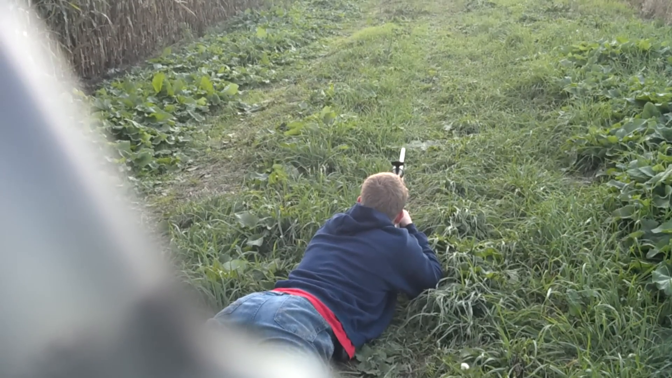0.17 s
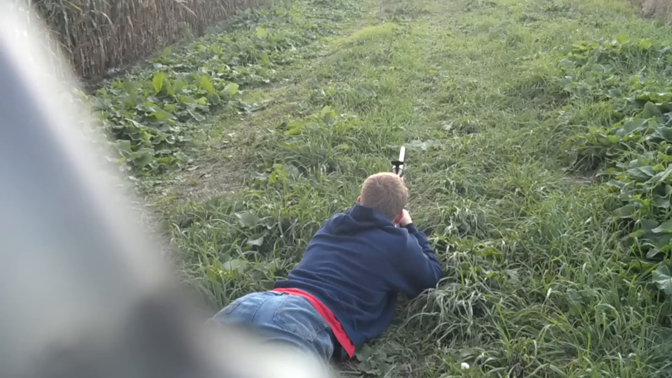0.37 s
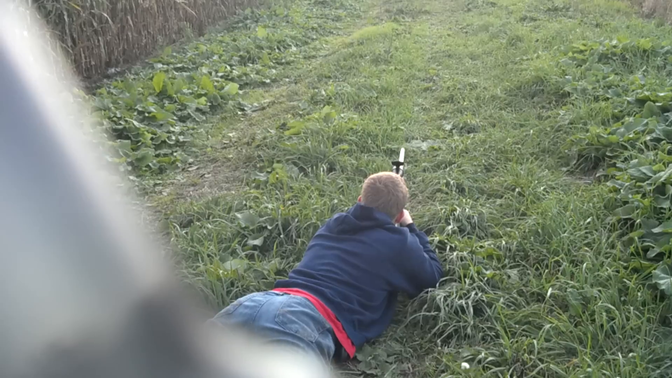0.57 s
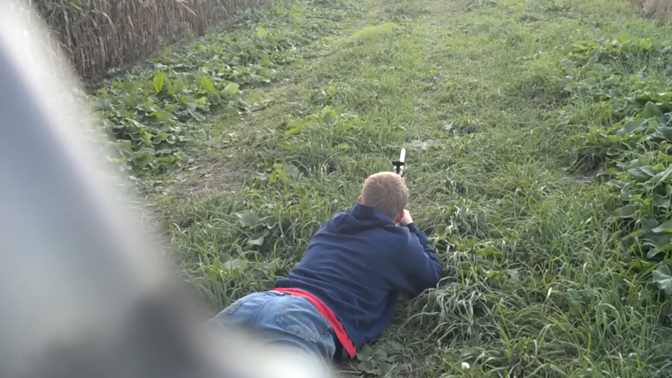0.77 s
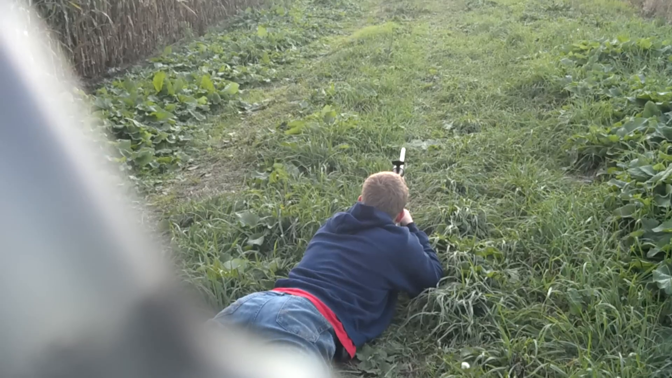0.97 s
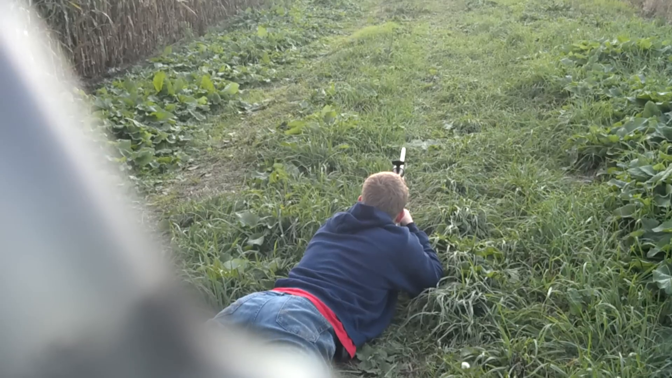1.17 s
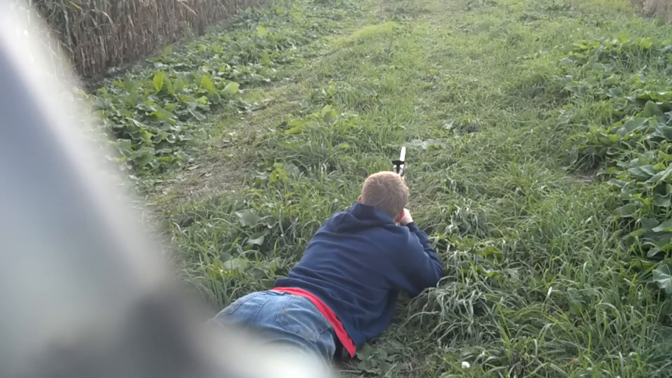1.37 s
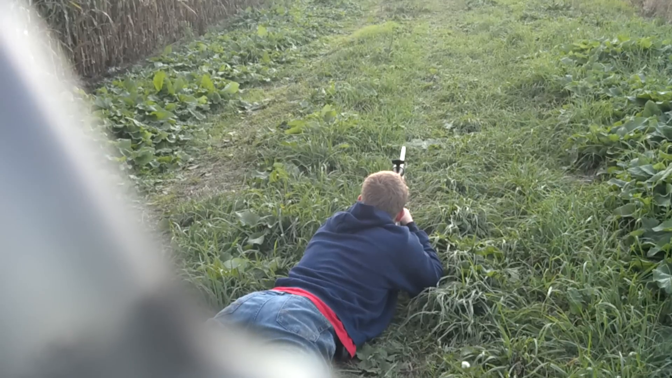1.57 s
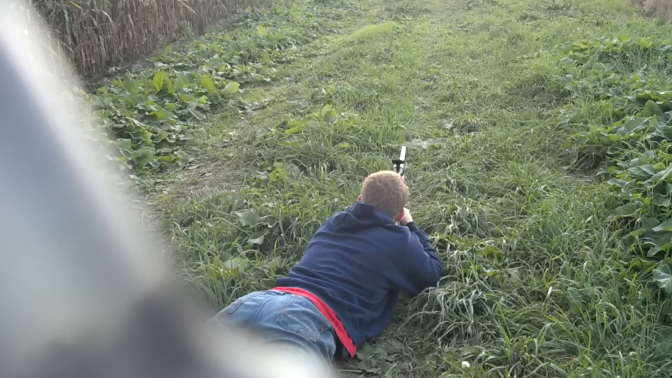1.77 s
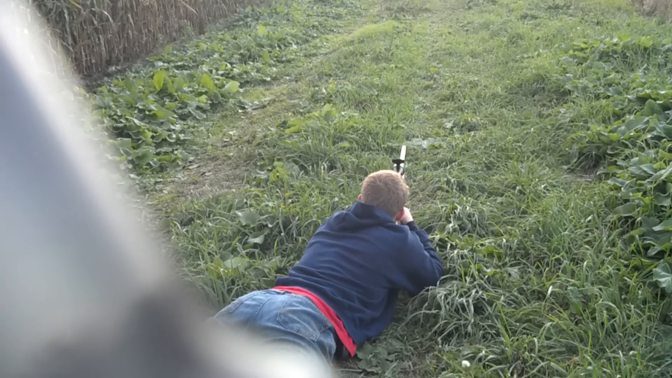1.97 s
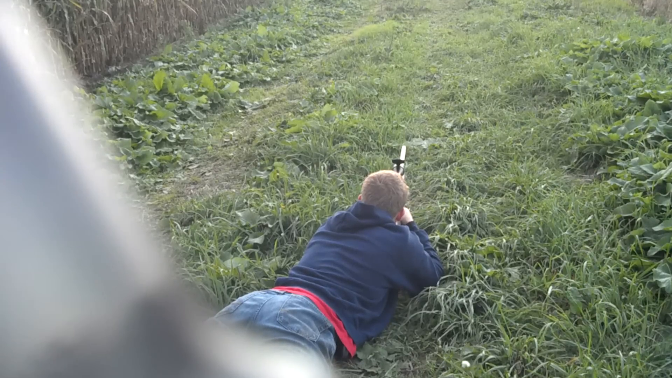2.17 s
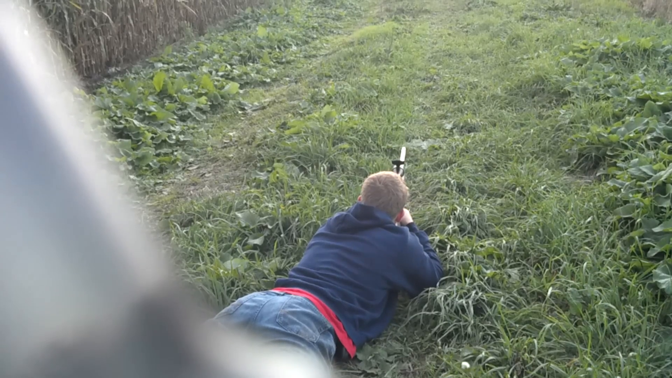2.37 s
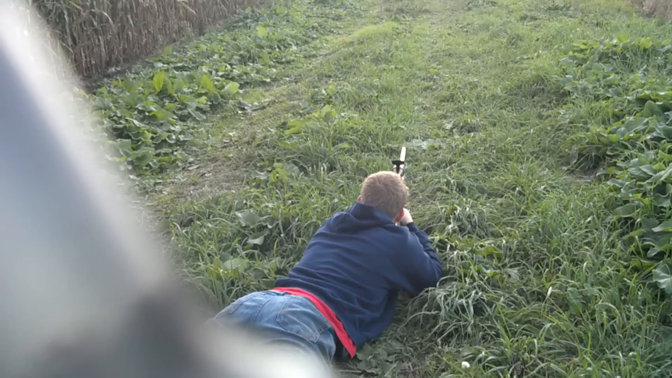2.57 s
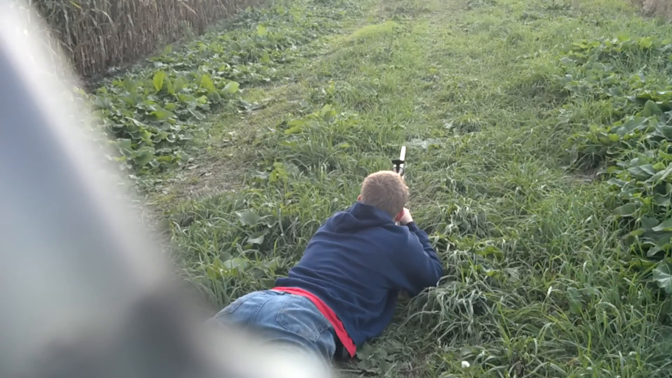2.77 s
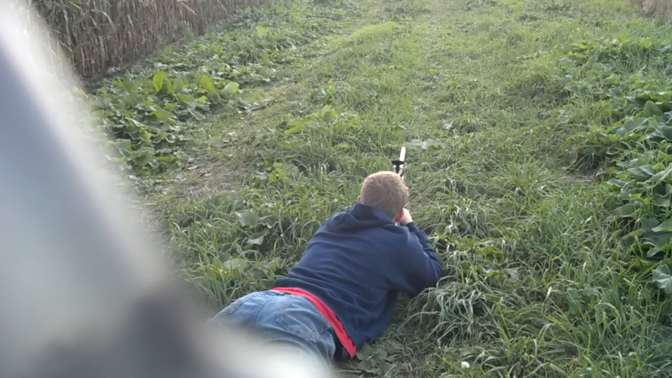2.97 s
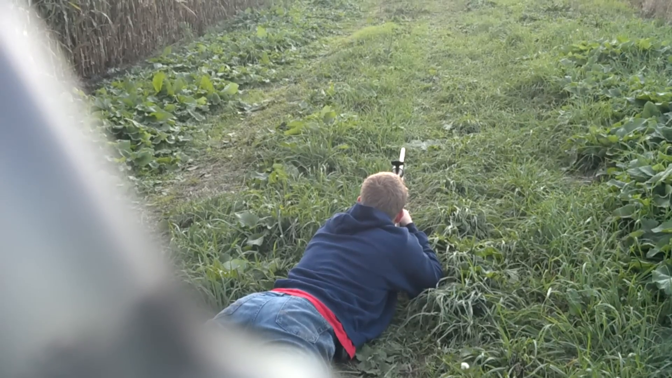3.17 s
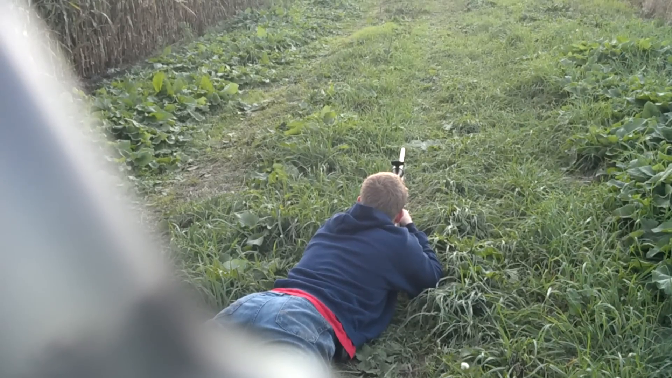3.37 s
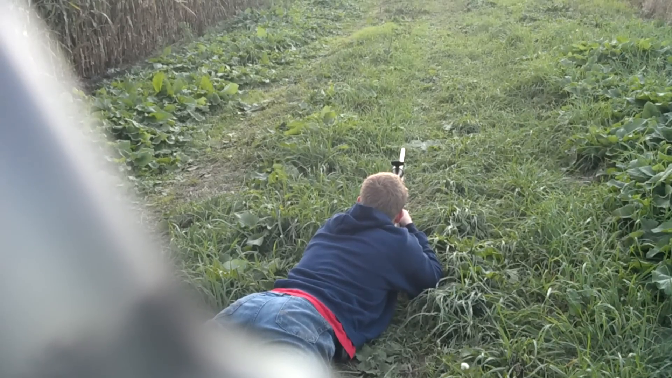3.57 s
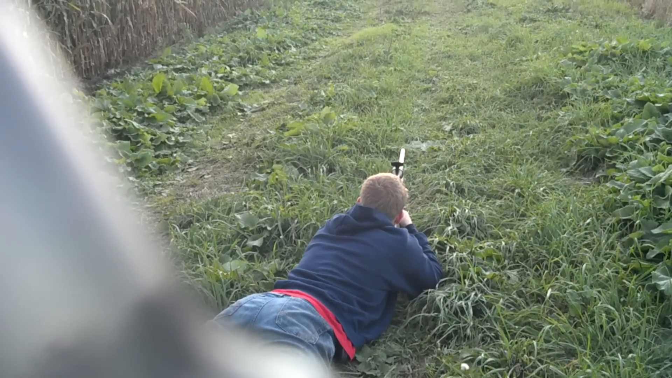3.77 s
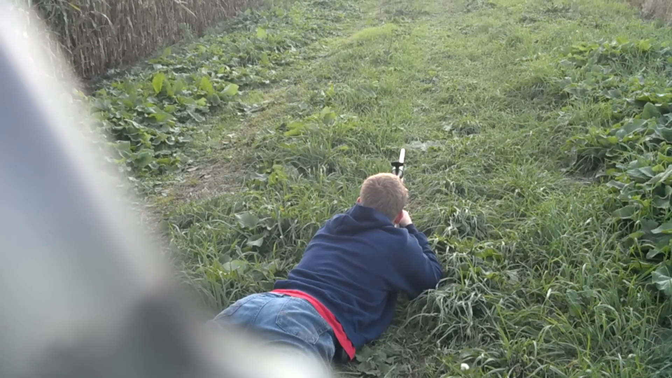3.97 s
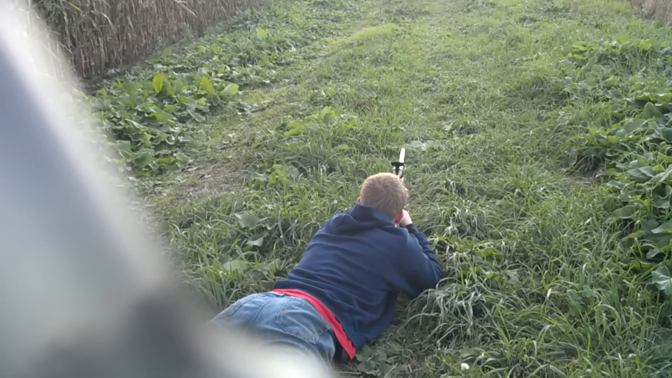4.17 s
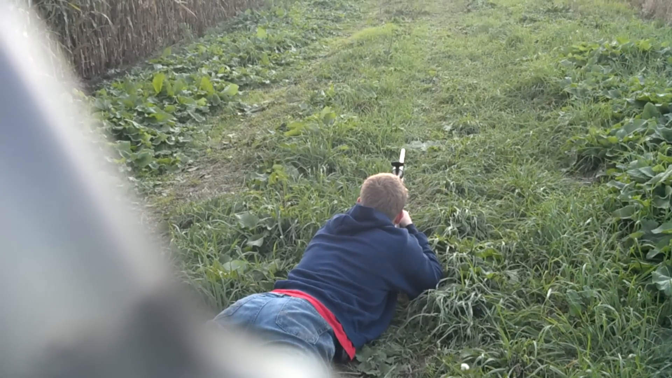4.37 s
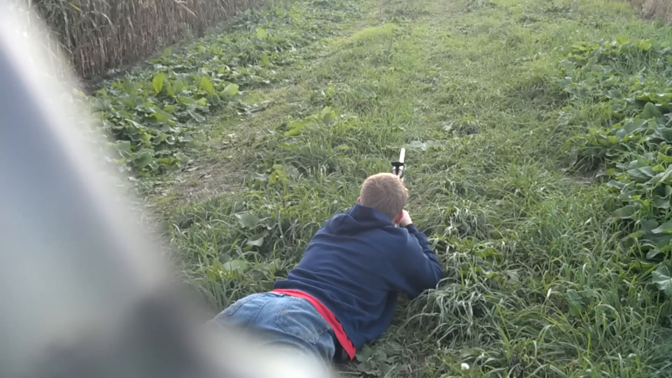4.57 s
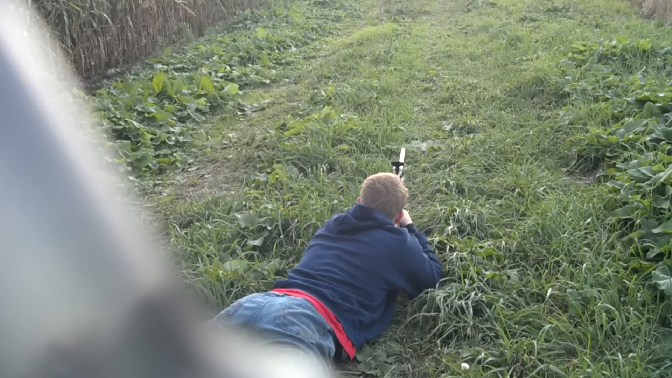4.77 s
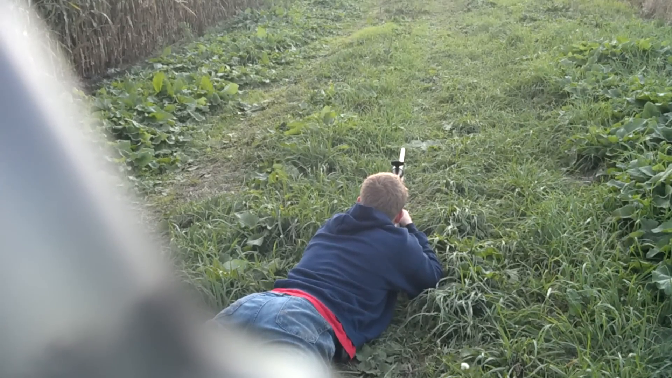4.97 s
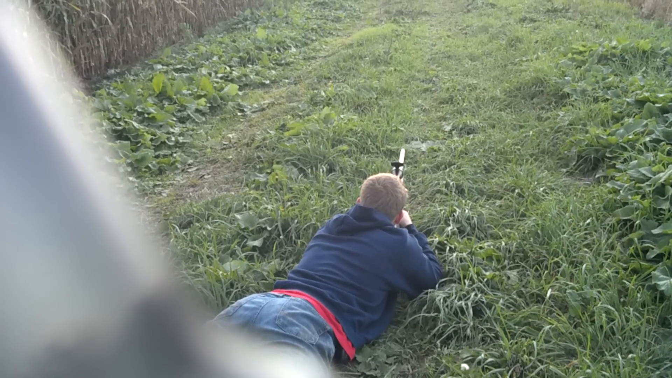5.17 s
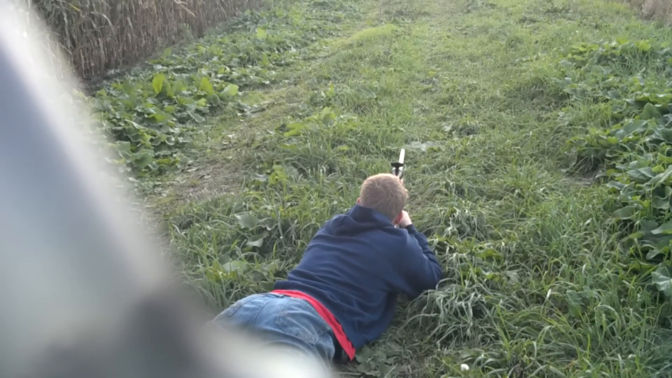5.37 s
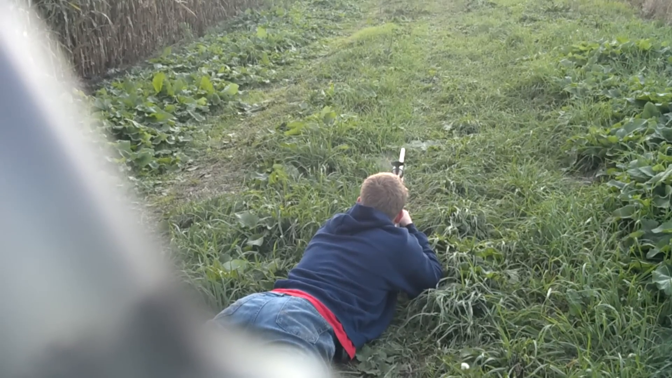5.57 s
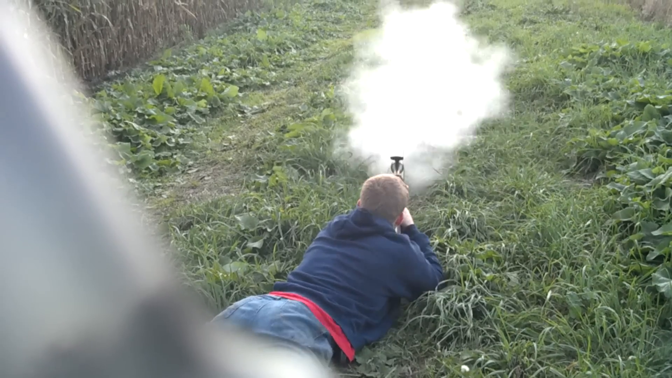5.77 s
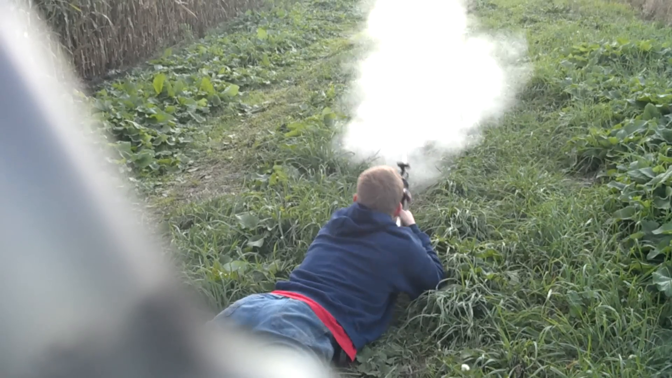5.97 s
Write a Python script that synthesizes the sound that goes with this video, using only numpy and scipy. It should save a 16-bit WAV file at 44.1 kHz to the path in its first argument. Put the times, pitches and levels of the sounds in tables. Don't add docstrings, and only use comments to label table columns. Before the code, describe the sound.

Faint crickets, hiss and distant traffic hum with small handling ticks, then a sharp cap snap and a black-powder rifle blast rolling outward, cut short.

```python
import sys
import numpy as np
from scipy import signal
from scipy.fft import rfft, irfft
from scipy.io import wavfile
from scipy.ndimage import uniform_filter1d, map_coordinates

SR = 44100
rng = np.random.default_rng(int(sys.argv[2]) if len(sys.argv) > 2 else 0)


def natural_amplitude(level_db):
    exponent = np.asarray(level_db, float) / 20
    return 10 ** exponent


def output_pcm(signal):
    pcm = np.clip(np.atleast_2d(signal).T, -1, 1) * 32767
    wavfile.write(sys.argv[1], SR, np.round(pcm).astype(np.int16))


N = 264688
t = np.arange(N) / SR
CAP_S, CHARGE_S = 5.5678, 5.6765
LATE_SAMPLES = 16

# (loudest at [s], half length [s], engine hum [dB], lift of the road rumble [dB])
VEHICLES = [
    (0.0, 0.06, -68, 1),
    (0.834, 0.52, -70.5, 3),
    (2.68, 0.2, -86.5, 2.5),
    (3.277, 0.31, -72, 1),
    (4.856, 0.47, -73.5, 3),
]


def rms_one(x):
    return x / np.sqrt(np.mean(x ** 2) + 1e-20)


def at_hz(points, hz, axis=1):
    points = np.array(points)
    return np.interp(np.log(hz), np.log(points[:, 0]), points[:, axis])


def drift(rate):
    knots = rng.standard_normal(1600)
    return map_coordinates(knots, [t * rate + 2], order=3)


def coloured(points, size=N):
    hz = np.maximum(np.fft.rfftfreq(size, 1 / SR), 10)
    low_cut = hz ** 2 / (hz ** 2 + points[0][0] ** 2 / 2)
    spectrum = rfft(rng.standard_normal(size)) * natural_amplitude(at_hz(points, hz)) * low_cut
    return rms_one(irfft(spectrum, size))


def butter(x, order, hz, kind):
    return signal.sosfilt(signal.butter(order, hz, kind, fs=SR, output="sos"), x)


def resonate(x, hz, width_hz):
    r = np.exp(-np.pi * width_hz / SR)
    zeros = np.array([1, 0, -1]) * (1 - r * r) / 2
    return signal.lfilter(zeros, [1, -2 * r * np.cos(2 * np.pi * hz / SR), r * r], x)


def resonate_twice(x, hz, width_hz):
    return resonate(resonate(x, hz, width_hz), hz, width_hz)


def ring(clicks, hz, t60):
    r, w = natural_amplitude(-60 / (t60 * SR)), 2 * np.pi * hz / SR
    return signal.lfilter([0, np.sin(w)], [1, -2 * r * np.cos(w), r * r], clicks + 1e-18)


def shot():
    # (frequency [Hz], level [dB], t60 [s])
    lock_modes = [(2050, -9, 0.018), (3010, -19, 0.039), (6690, -8, 0.007)]
    # (frequency [Hz], density [dB per Hz], t60 [s])
    cap_scatter = [(80, 0, 0.11), (312, 9.5, 0.15), (710, -7, 0.22), (2070, 3, 0.18), (4950, -10, 0.25),
                   (8600, -17.5, 0.3), (14400, -26, 0.13)]
    # (frequency [Hz], density [dB per Hz], t60 [s])
    near_rows = [(80, 9.5, 0.056), (214, 7, 0.29), (685, -12, 0.4), (2450, -5.5, 0.81), (3700, -8, 0.36),
                 (8170, -17, 0.45), (14600, -29.5, 0.27)]
    # (frequency [Hz], density [dB per Hz], t60 [s])
    far_field = [(100, -0.5, 1.7), (493, -9, 1.34), (1200, -3, 1.34), (2300, -1.5, 1.7), (3630, -5.5, 1.7),
                 (7650, -11, 0.98), (13100, -35.5, 1.2)]
    blow = 1.0 * (np.arange(N) == round(CAP_S * SR))
    lock = sum(natural_amplitude(db) * ring(blow, hz, t60) for hz, db, t60 in lock_modes)
    spatter = scatter(cap_scatter, CAP_S, -6.5, rise_ms=0.071, hold_ms=1.2)
    spatter *= natural_amplitude(-np.maximum(t - CAP_S, 0) * 2600)
    cap = butter(spatter, 2, 800, "high")
    cap += scatter(cap_scatter, CAP_S, -32.5, rise_ms=0.71, hold_ms=2.2)
    near = scatter(near_rows, CHARGE_S, -11.5, rise_ms=2.2, hold_ms=23.0)
    far = scatter(far_field, CHARGE_S, -22.5, rise_ms=97, hold_ms=23.0)
    far = butter(far, 4, 120, "high")
    return pulses() + lock + cap + near + far


def pulses():
    # (time [s], peak [dB], sign [+-1], squeeze [ms], low swing [dB])
    cap_pulses = [
        (5.56748, 22.5, -1, .23, -40),
        (5.56832, 9, -1, .12, -5),
        (5.56872, 3, 1, .2, -40),
        (5.5698, -3, 1, .15, -40),
    ]
    # (time [s], peak [dB], sign [+-1], squeeze [ms], low swing [dB])
    charge_pulses = [
        (5.6778, -9, 1, .6, -30),
        (5.6808, 2, 1, 1.1, -16),
        (5.6840, -2, -1, .5, -22),
        (5.6972, -4, 1, 1.2, -10),
    ]
    out = np.zeros(N)
    for s, db, sign, ms, swing_db in cap_pulses + charge_pulses:
        since_ms = np.maximum(t - s, 0) * 1000
        wave = (1 - since_ms / ms) * np.exp(-since_ms / ms) * (1 - np.exp(-since_ms / .04))
        swing = np.sin(2 * np.pi * .13 * since_ms ** .93) * np.exp(-since_ms / 3.6)
        out += sign * (natural_amplitude(db) * wave + natural_amplitude(swing_db) * swing)
    return out


def scatter(points, start_s, level_db, rise_ms, hold_ms):
    first = int(5.5 * SR)
    since = np.maximum(t[first:] - start_s, 0)
    dying = np.maximum(since - hold_ms / 1000, 0)
    noise = coloured(points, size=N - first)
    edges = 40 * 2 ** np.arange(0, 9.1, .5)
    out = np.zeros(N)
    for k, (low, high) in enumerate(zip(edges, edges[1:])):
        band = (-1) ** k * butter(noise, 2, [low, high], "band")
        t60 = at_hz(points, np.sqrt(low * high), axis=2)
        out[first:] += band * natural_amplitude(-60 * dying / t60)
    out[first:] *= (1 - np.exp(-since * 1000 / rise_ms)) ** 2
    return out * natural_amplitude(level_db) * natural_amplitude(1.2 * drift(150))


def rustle():
    # (frequency [Hz], density [dB per Hz])
    cloth = [(300, 15), (1000, 0.5), (2500, 4.5), (5500, -1.5), (9500, -6), (15200, -20), (15500, -60)]
    start_s, attack_s, hold_s, release_s = 0.0, 0.047, 0.208, 0.012
    since = t - start_s
    fade = np.exp(-np.maximum(since - attack_s - hold_s, 0) * 3 / release_s)
    stroke = np.clip(since / attack_s, 0, 1) * fade
    arch_db = -2 * np.minimum(2 * (since - attack_s) / hold_s - 1, 1) ** 2
    return coloured(cloth) * stroke * natural_amplitude(-59.5 + arch_db + 2.5 + 1.6 * drift(199.0))


def ticks():
    # (time [s], bright part [dB], dull part [dB], length [ms])
    touches = [(0.1718, -47, -49, 6.7), (0.2039, -45.5, -65, 3.4), (0.2844, -58, -67, 2.9),
               (1.3004, -74, -53.5, 5.1), (2.116, -54.5, -60.5, 6.4), (2.1274, -62, -74, 3.1),
               (2.335, -57, -52, 5.3), (2.342, -48, -53.5, 3.5), (2.4444, -70, -64, 2.5),
               (2.5372, -56, -63.5, 4.6), (3.2694, -63, -66.5, 4), (3.678, -57, -59, 3.6),
               (4.049, -71, -60.5, 3.8), (4.3315, -52, -56.5, 8.1), (4.378, -44.5, -63, 8)]
    # (frequency [Hz], width [Hz], level [dB])
    case_modes = [(3000, 2900, -5.5), (4700, 910, -9), (7460, 1200, -5), (10800, 3000, -27),
                  (13500, 3200, -27)]
    # (time [s], level [dB])
    knocks = [
        (0.2844, -65),
        (1.3004, -45),
        (2.4444, -61.5),
        (2.5374, -65),
        (4.3784, -53.5),
    ]
    bright, dull, hollow = np.zeros((3, N))
    u = np.arange(1500) / SR
    for s, db, dull_db, ms in touches:
        i = round(s * SR)
        rate = 3200 / ms
        burst = rng.standard_normal(1500) * u * rate * np.exp(-u * rate)
        bright[i:i + 1500] += natural_amplitude(db + 14) * burst
        dull[i:i + 1500] += natural_amplitude(dull_db + 21.5) * resonate_twice(burst, 1290, 1760)
    for s, db in knocks:
        hollow[round(s * SR)] += natural_amplitude(db)
    shell = sum(natural_amplitude(db) * resonate(bright + 1e-18, hz, width) for hz, width, db in case_modes)
    ping, ping_hz, ping_t60 = natural_amplitude(-44) * (np.arange(N) == round(3.677 * SR)), 4630, 0.03
    shell = shell + ring(ping, ping_hz, ping_t60) - ring(ping, ping_hz, ping_t60 / 4)
    knock = ring(hollow, 748, 0.14) - ring(hollow, 748, 0.028) + natural_amplitude(3.5) * ring(hollow, 520, 0.022)
    return shell + dull + knock


def trills():
    # (carrier [Hz], pulse rate [per s], level [dB], share of the rate lost when tiring [0-1])
    singers = [(4800, 43.3, -67, .19), (4450, 52, -77, 0), (4250, 43.6, -72.5, 0), (4050, 44.5, -68, 0),
               (3700, 44, -72.5, 0)]
    tires_s, tiring_s = 3.3, 0.72
    out = np.zeros(N)
    for hz, per_s, level_db, tiring in singers:
        per_s = per_s * (1 - tiring * np.clip((t - tires_s) / tiring_s, 0, 1))
        stroke = np.cumsum(per_s * (1 + .008 * drift(1.2))) / SR % 1
        pitch = hz * (1 + .008 * drift(3) - .26 * (stroke - .25))
        tone = np.sin(2 * np.pi * np.cumsum(pitch) / SR)
        pulse = np.sin(np.pi * np.minimum(stroke / .42, 1)) ** 2
        out += tone * pulse * natural_amplitude(level_db + 1.6 * drift(5))
    return out


def crickets():
    # (carrier [Hz], width [Hz], pulse rate [per s], depth [0-1], level [dB])
    choirs = [(3750, 480, 39, 0.14, -73), (4106, 490, 45, 0.6, -72.5), (4424, 610, 90, 0.7, -78)]
    out = np.zeros(N)
    for hz, width_hz, per_s, depth, level_db in choirs:
        carrier = rms_one(resonate_twice(rng.standard_normal(N), hz, width_hz))
        wing = np.cos(2 * np.pi * np.cumsum(per_s * (1 + 0.0414 * drift(1.9))) / SR)
        out += carrier * (1 + np.clip(depth, 0, 1) * wing) * natural_amplitude(level_db + 1.3 * drift(2.47))
    return out


def drone():
    hum = rms_one(resonate_twice(rng.standard_normal(N), 290, 60))
    rest_db = -81
    return hum * natural_amplitude(5) * (natural_amplitude(rest_db) + natural_amplitude(np.array(VEHICLES)[:, 2]) @ swells())


def air():
    # (frequency [Hz], density [dB per Hz])
    air_spectrum = [(60, -15), (130, 4.5), (300, -12.5), (500, -12.5), (1300, -24), (7000, -29),
                    (15200, -35.5), (15500, -80)]
    noise = coloured(air_spectrum)
    low = butter(noise, 2, 380, "low")
    swell_db = -1.5 + np.array(VEHICLES)[:, 3] @ swells()
    return natural_amplitude(-61.5) * (noise - low + low * natural_amplitude(swell_db + 2.2 * drift(5.2)))


def swells():
    return np.array([np.exp(-((t - s) / half_s) ** 4) for s, half_s, _, _ in VEHICLES])


def scene():
    ducked = natural_amplitude(-6 * (t > CAP_S))
    field = air() + drone() + crickets() + trills()
    mono = field * ducked + rustle() + ticks() + shot()
    return np.array([mono, mono])


def sum_difference(left, right):
    # (frequency [Hz], share lost [0-1])
    pruned = [(300, 0.16), (1500, 0), (4000, 0.04), (7000, 0), (10000, 0)]
    # (frequency [Hz], phase error [rad])
    slip = [(60, 0.), (200, .8), (700, .6), (2000, .7), (3500, .2), (5200, .2), (7000, 1.), (14000, 1.2)]
    # (frequency [Hz], level [dB])
    narrowed = [(60, 2.5), (130, -8), (260, -4), (520, -4), (900, -2.5), (2000, 0)]
    both = np.array([left + right, left - right]) / 2
    hz, s, (mid, side) = signal.stft(both, SR, nperseg=256, noverlap=192)
    hz = np.maximum(hz, 10)[:, None]
    turn = np.cos(2 * np.pi * hz * LATE_SAMPLES / SR)
    calm = np.clip(abs(s - CAP_S) / .006 - 1, 0, 1)
    lost = np.clip(at_hz(pruned, hz), 0, 1) * (.4 + .6 * calm)
    error = uniform_filter1d(rng.standard_normal(mid.shape), size=7, axis=1)
    error = rms_one(uniform_filter1d(error, size=3, axis=0)) * calm
    mid = mid * (1 - (hz > 1400) * np.exp(-22 * (1 - turn)))
    starved, over_top = (s > 5.692) * (hz > 9500), hz > 15400
    chance = np.repeat(rng.standard_normal(mid.shape), 16, axis=1)[:, :len(s)]
    gaps = turn + .25 * chance
    mid = mid * (1 - starved * ((gaps > .1) | over_top))
    side = side * (1 - starved * ((gaps < -.3) | over_top))
    mid = mid * (1 - lost / (1 + np.exp(-6.5 * (turn - .4))))
    mid = mid * np.exp(1j * at_hz(slip, hz) * error)
    side = side * (1 - lost / (1 + np.exp(4.0 * (turn + .3))))
    side = side * natural_amplitude(at_hz(narrowed, hz)) * (1 - calm * np.exp(-14 * (1 + turn)))
    return signal.istft(np.array([mid + side, mid - side]), SR, nperseg=256, noverlap=192)[1][:, :N]


def top_cut(x):
    return signal.sosfilt(signal.butter(12, 16570, fs=SR, output="sos"), x)


def record(dry):
    offset = [
        [-.00093],
        [.00117],
    ]
    left = butter(2.2 * np.tanh(dry[0] / 2.2), 4, 80, "high")
    left = signal.sosfiltfilt(signal.cheby2(16, 40, 16150, fs=SR, output="sos"), left)
    right = -natural_amplitude(3) * np.append(np.zeros(LATE_SAMPLES), left[:-LATE_SAMPLES])
    pair = sum_difference(left, right)
    return top_cut(np.clip(pair + offset, -.99, .99))


dry = scene()
out = record(dry)
output_pcm(out)
```